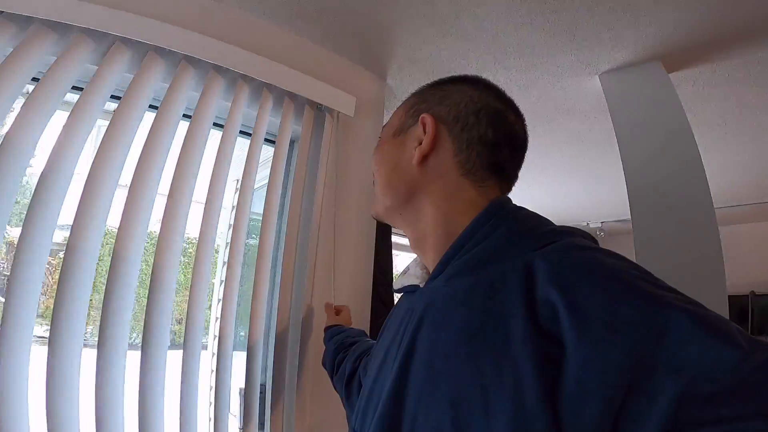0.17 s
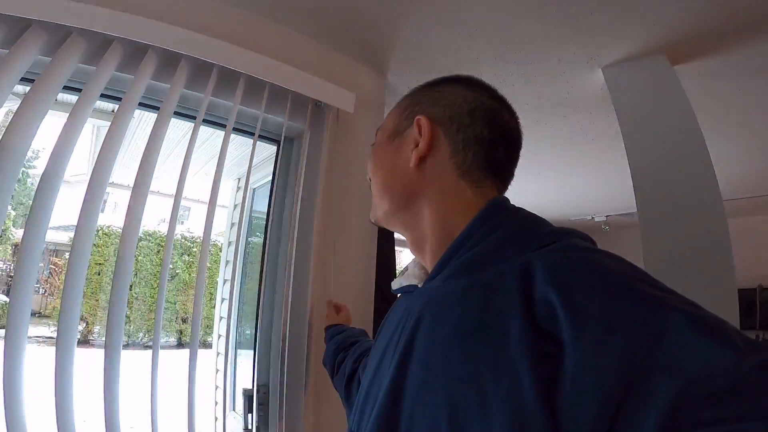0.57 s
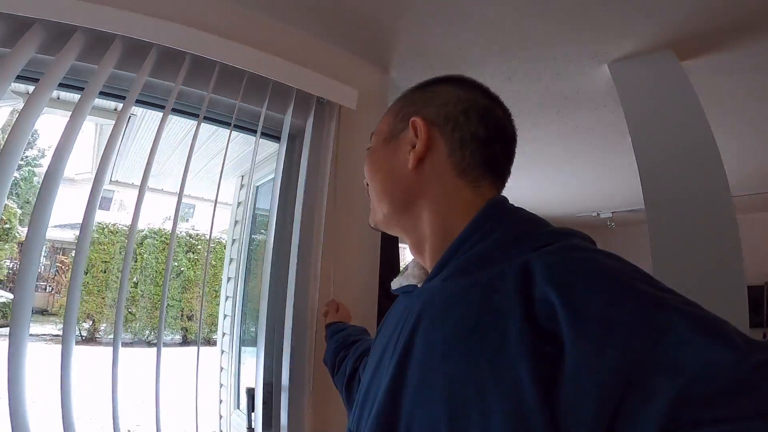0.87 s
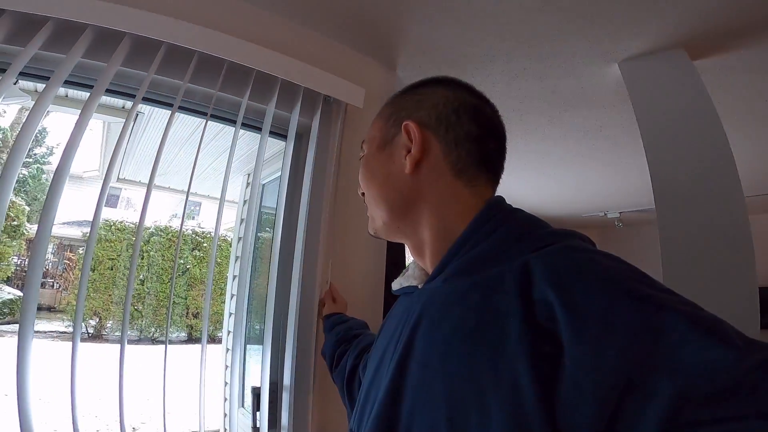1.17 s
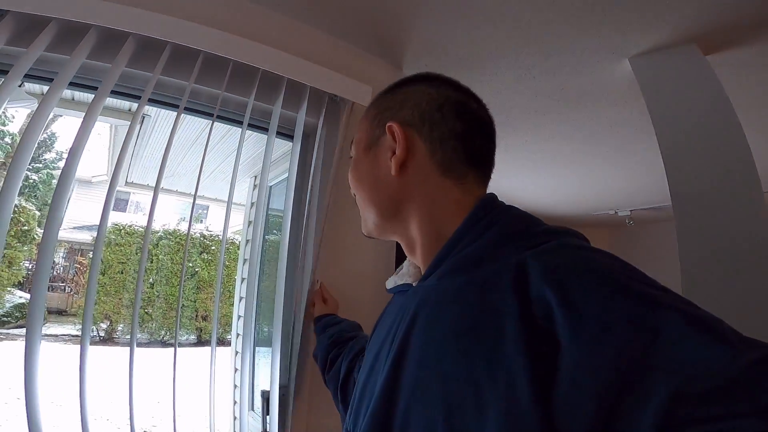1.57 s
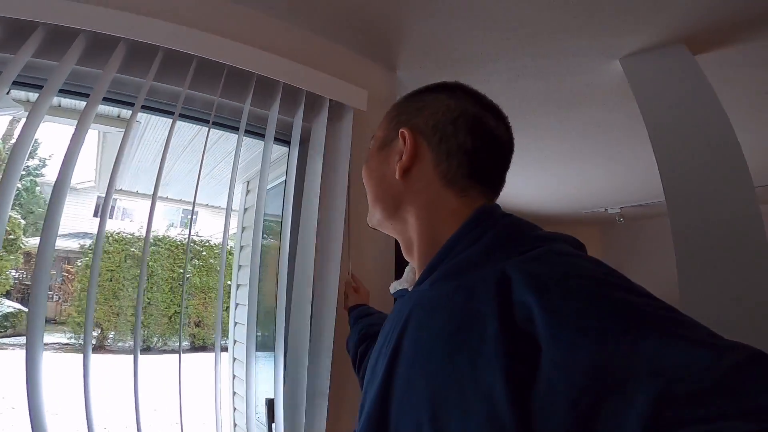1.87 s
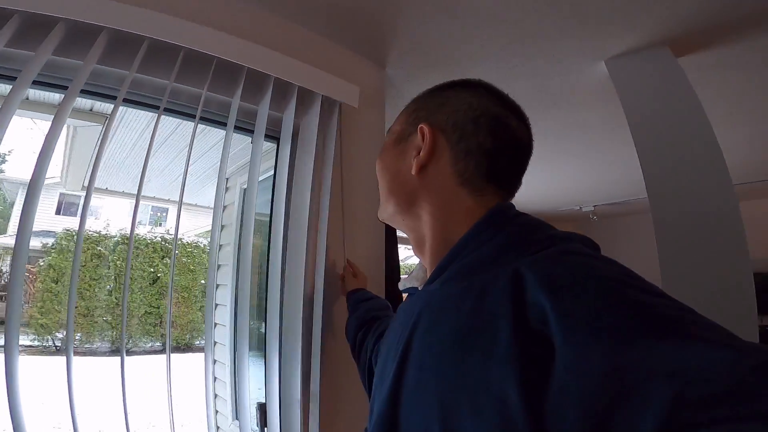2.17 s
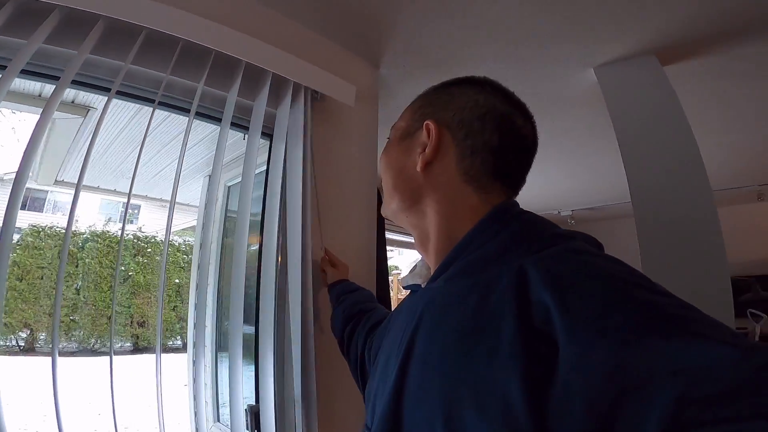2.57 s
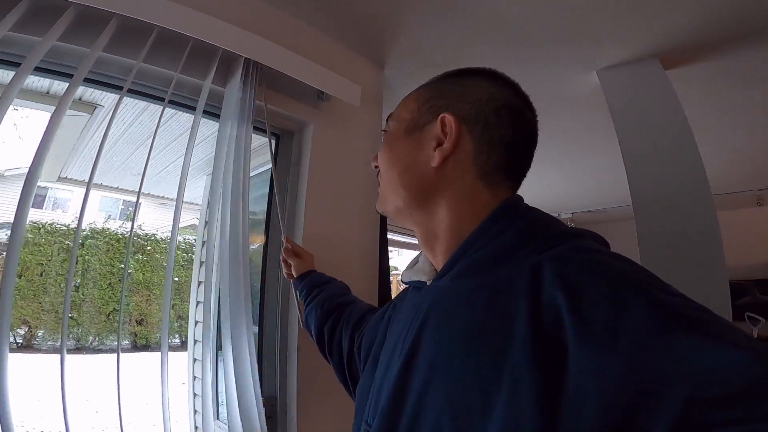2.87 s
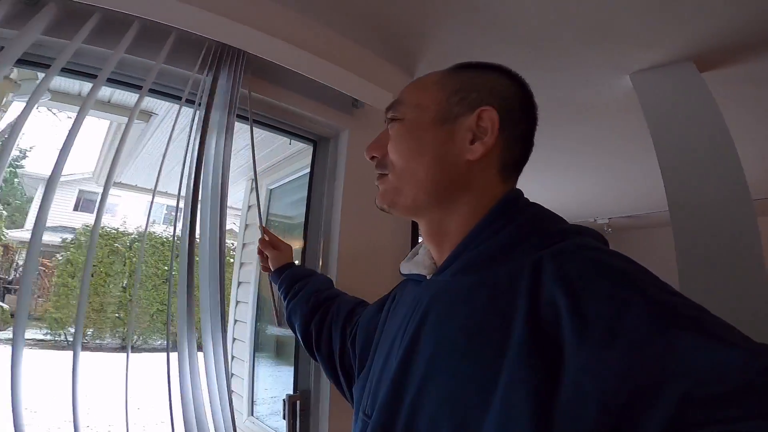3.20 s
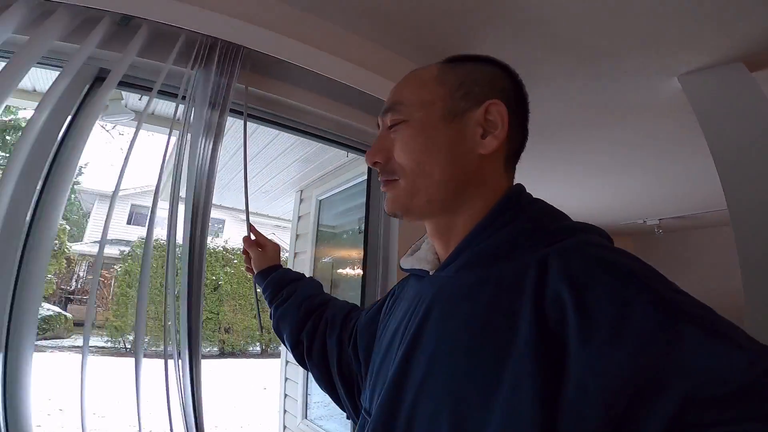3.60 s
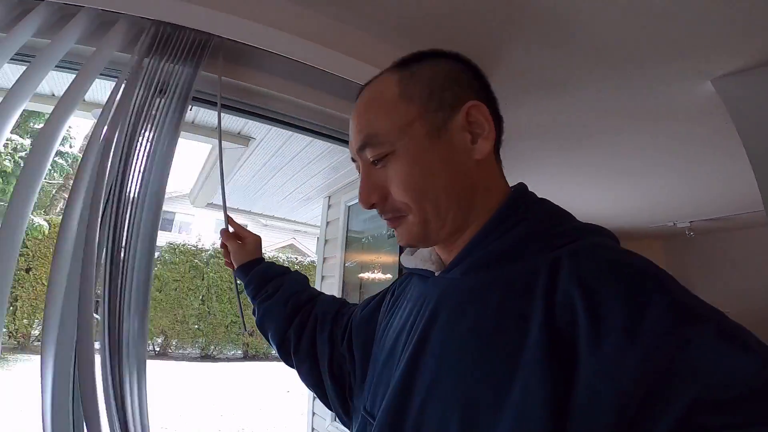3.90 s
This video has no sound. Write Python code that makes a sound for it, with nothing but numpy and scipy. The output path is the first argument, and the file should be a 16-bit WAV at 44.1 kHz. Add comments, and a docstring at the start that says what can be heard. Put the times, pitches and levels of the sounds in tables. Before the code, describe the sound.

Close, hand-held stereo pickup of vertical blinds indoors. Sparse light clicks and faint creaking come first, with a sharper snap after one second. A dense hollow plastic clatter follows around one and a half seconds, with a faint metallic ping, then dies away. From about two and a half seconds the slats are pulled aside with a rough, bright scrape, chattering hooks and repeated slaps until the end.

```python
"""Vertical plastic blinds opened by their wand in a living room, an arm's length from a hand-held microphone.
First the twisted wand makes the tilt rod creak by stick-slip, and carriers snap and ring the head rail.
Then turning slats clap hollowly, as struck plastic, and the freed row clatters and rings on; a metal clip pings.
Last the carriers are dragged along, on the whole faster: they scrape, squeak and hiss as powers of speed,
hooks chatter and the nearing slats slap and tick. Quiet room air and a low rumble lie under it all."""
import sys
import numpy as np
from scipy import signal
from scipy.fft import rfft, irfft, next_fast_len
from scipy.io import wavfile
from scipy.ndimage import uniform_filter1d

SR = 44100
rng = np.random.default_rng(int(sys.argv[2]) if len(sys.argv) > 2 else 0)


def log_audio(samples):
    """Write samples as a 16-bit WAV file to the path given in sys.argv[1]."""
    # one column per channel
    frames = np.atleast_2d(samples).T
    # limit to full scale, then quantise
    limited = np.clip(frames, -1, 1)
    pcm = np.round(limited * 32767).astype(np.int16)
    wavfile.write(sys.argv[1], SR, pcm)


N = 178296
TAIL = 2 ** 15  # samples per hit and room response
TIME = np.arange(N) / SR
TOP_HZ = 15400

# carriers snapping in the rail: start_s, level_db, weight_db, hardness_db, fizz_re_snap_db, build_s,
# chatter_s, rail_freedom_db, clack_hz
SNAPS = [(0.17, -65.5, -14, 2.5, -22, .0005, 0.0052, -12, 2180),
         (0.195, -69, 9, -16, -17, 0.00083, 0.0046, -10, 1190),
         (0.288, -54.5, -15, -10, -19, 0.00046, 0.001, -17, 1420),
         (0.313, -54, -23, -25, -12, 0.0037, 0.0052, -15, 1210),
         (0.613, -57, -11, -20, -17, .001, 0.0019, -19, 1220),
         (0.634, -54.5, -18, -6, -8, 0.0026, 0.011, 0, 2140),
         (0.655, -48.5, -27, -8.5, -8.5, 0.00071, 0.0016, -6, 2090),
         (0.717, -38.5, -14, -14, -27, 0.002, 0.0027, -8, 2150),
         (0.726, -39.5, -13, -9.5, -13.5, 0.0022, 0.0084, -5, 1280),
         (0.982, -45.5, -10.5, -13.5, -31, .0001, .0007, -15, 1340),
         (1.014, -41, -11, -10, -12, 0.0017, 0.01, -6, 1210),
         (1.164, -30, -8, -6, -19, 0.0024, 0.004, -1.5, 1220),
         (1.912, -51.5, -15, -3.5, -17, 0.00075, 0.023, 1, 1680),
         (1.997, -50.5, -16, -6.5, -13.5, 0.00043, 0.004, 5, 2200),
         (2.054, -60.5, -10, 2.5, -15.5, 0.0007, 0.0042, -10, 5600),
         (2.22, -56.5, -30, -4.5, -16, 0.0098, 0.021, -9, 1640),
         (2.324, -45, -13, -4.5, -11, 0.00083, 0.0044, -25, 1900),
         (2.332, -32, -14.5, -9.5, -18, 0.0047, 0.0045, -24, 1940),
         (2.372, -45, -9, -17, -15, 0.00036, 0.0023, -21, 1700),
         (2.594, -30, -38, 1.5, -9.5, 0.0023, 0.0034, -16, 2260),
         (3.11, -38.5, -10, -1.5, -10, 0.00073, 0.0042, -8, 1870),
         (3.214, -32, -18, -7, -20, 0.00091, 0.0058, -16, 1830)]
# slats slapping together: start_s, level_db, weight_db, hardness_db, fizz_re_snap_db, build_s,
# chatter_s, rattle_s, ring_hz
SLAPS = [(1.398, -31.5, -11, -15.5, -21, 0.00078, 0.0045, .018, 1150),
         (1.44, -49.5, 8.5, -11, -15, 0.0019, 0.011, 0.024, 800),
         (1.533, -59, 9, -29, -25, 0.0013, 0.0021, 0.022, 1320),
         (1.539, -34.5, -5, -5.5, -16, 0.00041, 0.0031, 0.06, 447),
         (1.544, -33, -10, -10.5, -24, 0.0013, 0.002, 0.027, 704),
         (1.566, -42, 2.5, -6, -18, 0.00034, 0.0014, 0.031, 450),
         (1.598, -35, -9, -8.5, -19, 0.0014, 0.0022, .04, 1330),
         (1.606, -41.5, -2, -9, -9, .0005, 0.0021, 0.025, 790),
         (1.648, -38, -2, -10, -14, 0.0015, 0.0089, 0.045, 760),
         (1.764, -47, -3, -2, -18, 0.0011, 0.005, .02, 2560),
         (1.778, -49, -28, -22, -7, 0.0012, .0051, .02, 720),
         (2.72, -38, -17.5, -3, -15, .001, 0.027, .041, 2170),
         (2.832, -38, -11, -2.5, -9.5, 0.0016, 0.019, .067, 1440),
         (2.913, -39.5, -10.5, -1.5, -8, 0.00074, 0.013, .05, 1810),
         (2.929, -39, -4, 2.5, -20, .001, .0054, .04, 770),
         (3.078, -43.5, -8, 0, -24, 0.0022, 0.029, .05, 1900),
         (3.365, -34, -5.5, -4.5, -10, 0.003, 0.0037, 0.064, 760),
         (3.485, -37.5, -16, -4, -11, 0.0014, 0.036, .05, 1380),
         (3.627, -37, -16.5, -20, -16, 0.0011, 0.0079, 0.03, 2180),
         (3.743, -36.5, -27, -12, -3, .001, 0.014, .04, 2010),
         (3.849, -33, -20, -7, -12, 0.0014, 0.012, .06, 2100),
         (3.905, -39.5, -5, -2, -12, 0.00083, 0.012, .03, 1390),
         (3.937, -29.5, -8, -0.5, -12, 0.00077, 0.0088, .05, 1470),
         (3.963, -33, -13, -7.5, -5, .001, 0.0096, .04, 1300),
         (4.031, -28.5, -7.5, -2.5, -13, .0002, 0.0033, .05, 1920)]
# pull along the rail: time_s, speed_re_full_db
PULL = [(2.42, -30), (2.55, -10), (2.61, -3.5), (2.8, -5), (3.12, -1), (3.3, -4), (3.44, -5), (3.52, -1.5),
        (3.6, -2), (3.72, 1.5), (4.04, 1.5)]
# twists of the wand: peak_s, relative_force_db
TWISTS = [(0.006, -48), (0.252, -59), (0.315, -57), (0.479, -52), (0.68, -55), (2.019, -49.5), (2.247, -54),
          (2.41, -49)]
# jolts that set hanging slats twanging: start_s, level_db, start_pitch_hz
JOLTS = [(0.297, -54, 286.7), (0.711, -49.5, 271.4), (1.014, -45, 276), (1.164, -42, 272.4),
         (2.016, -54.5, 280.4), (2.336, -46, 278.3)]
# hooks chattering as their carriers are picked up: start_s, level_db, decay_s
HOOKS = [(2.698, -48, 0.0044), (2.822, -44, 0.0091), (3.017, -50, 0.01), (3.073, -41.5, 0.016),
         (3.165, -39.5, 0.0079), (3.175, -48, 0.0048), (3.509, -45, .006), (3.618, -43, 0.0066),
         (3.849, -39.5, 0.0063)]
# heaviest knocks, shaking the wall behind the rail: start_s, level_db
THUDS = [(1.398, -51.5), (1.562, -56), (2.335, -47.5), (2.61, -53)]
# swings of the arm that buffet the microphone: peak_s, relative_level_db
SWINGS = [(0.49, -60), (1.38, -54), (1.62, -59), (1.92, -51), (2.75, -46.5), (3.0, -58), (3.48, -59),
          (3.96, -60)]
# slats coming nearer and damping each other: time_s, direct_db, rattle_db
APPROACH = [(1.5, -4, -12), (2.6, 1, -15), (3.4, 5, -22), (4.04, 5, -22)]

# modes of the head rail and its carriers: freq_hz, relative_db, t60_s
RAIL_MODES = [(1173, 13, .3), (1217, 9, .3), (1351, 12, .3), (1390, 12, .3), (1646, 3, .25), (1774, 4, .25),
              (1983, 4, .25), (2178, 2, .25), (3246, -3, .3), (3418, -3, .3), (4597, -4, .27),
              (4963, 2, .25), (5146, 3, .22), (6401, 0, .24)]
# modes of a small metal clip: freq_hz, level_db, t60_s
CLIP_MODES = [(3321, -65, .25), (4350, -60, .38), (4635, -65, .17), (5109, -53, .33), (5240, -63, .22),
              (5900, -56, .26), (6761, -57, .26), (7020, -69, .2), (8037, -72, .2), (8640, -69, .2)]
# hollow modes of the swinging row of slats: freq_hz, level_db, t60_s
ROW_MODES = [(389, -34, 0.57), (450, -39, .35), (745, -44, 0.64), (1037, -45, .4)]

# colour of the struck rail: freq_hz, relative_db
RAIL = [(60, -57), (130, -21), (190, -14.5), (280, -9.5), (520, -14.5), (590, -20.5), (800, -13),
        (1000, -5), (1160, 7.5), (1270, 2), (1390, 12), (1600, 1.5), (2150, 4), (2700, -6), (3100, -4),
        (3450, -2.5), (3900, -7.5), (5100, -5.5), (5650, -11.5), (6350, -7.5), (6850, -16.5), (8100, -25),
        (10000, -39.5), (13000, -57), (16000, -60)]
# colour of clapping slats: freq_hz, relative_db
SLAT = [(60, -39), (150, -7), (260, -5.5), (350, 4), (440, 1.5), (530, -7.5), (610, 3.5), (720, 4),
        (900, -0.5), (1100, 4.5), (1320, 4), (1520, -0.5), (2000, 1.5), (2350, -4.5), (2750, 0),
        (3300, -8.5), (3800, -6.5), (6500, -15), (10000, -27), (15000, -45)]
# colour of sliding carriers: freq_hz, relative_db
SLIDE = [(59, -33), (100, -29), (214, -21), (281, -13.5), (378, -23.5), (447, -22.5), (697, -19.5),
         (956, -11.5), (1130, -3.5), (1440, 2), (1650, -2), (1900, 1.5), (2220, 1.5), (3120, -9),
         (5300, -5.5), (6850, -4.5), (8000, -13.5), (10000, -15.5), (12300, -23), (15500, -40)]
# colour of the rubbing tilt rod: freq_hz, relative_db
RUB = [(60, -39), (150, -7), (260, 6.5), (400, -2.5), (600, -7), (850, -4), (1200, 3.5), (1450, 7),
       (1750, -5), (2200, 1), (2700, -11.5), (3400, -12.5), (5000, -19), (7000, -24), (10000, -40),
       (15000, -41)]
# colour of the room air: freq_hz, relative_db
FLOOR = [(20, -28), (50, -60), (100, -6), (250, 5.5), (500, -11), (1300, -3), (2500, -17), (6000, -18),
         (15000, -36)]

# reverberation of the room: freq_hz, t60_s
ROOM = [(150, 0.88), (400, 0.41), (1000, 0.52), (2800, 0.47), (7000, 0.33), (14000, 0.064)]
# the two microphone ports: freq_hz, likeness_0_to_1, left_minus_right_db
PORTS = [(60, .97, 0), (250, .98, -2.8), (600, .95, -2.8), (1200, .87, 2.4), (2000, .7, 4.2),
         (4000, .42, 3.2), (8000, .03, 3.2), (13000, .05, .8)]
# phase between the ports: freq_hz, left_lead_rad
PORT_PHASE = [(50, -1.3), (260, -1.4), (600, -0.96), (1400, 0.6), (3000, -1.27), (8000, -0.3)]

TWIST_RISE_S, TWIST_FALL_S = 0.039, 0.021
JOSTLE_S, JOSTLE_HOLD_S, JOSTLE_T60_S = 1.538, 0.056, 0.54  # freed slats jostle their neighbours
CLIP_S = 1.6
GATHER_S = 2.6  # the first slat is caught and dragged along
SWING_S = 0.035


def snaps(hidden_db=-2, loose_db=6, clack_db=0, clack_width=0.26):
    """Carriers let go behind the valance, each with its own clack, and ring the rail."""
    out = np.zeros((2, N))
    for s, db, weight_db, hard_db, fizz_db, build_s, chatter_s, free_db, clack_hz in SNAPS:
        direct_db, rattle_db = approach(s)
        push = blow(build_s, chatter_s, chatter_db=10.0, rattle_db=rattle_db + loose_db, rattle_s=0.006)
        heard = even(through(push, room(direct_db + hidden_db, early_db=-2.5)))
        struck = rail(heard, ring_db=free_db - 55)
        clack = boost(struck, clack_hz, clack_width, clack_db)
        add(out, s, clack, db, weight_db, hard_db, fizz_db)
    return out


def rail(x, ring_db):
    """The head rail's broad body, and its modes ringing on in proportion to the blow."""
    t = np.arange(TAIL) / SR
    ring = 0
    for hz, db, t60_s in RAIL_MODES:
        ring = ring + undb(db - 60 * t / t60_s) * np.sin(2 * np.pi * (hz * t + rng.random()))
    ring = ring * (1 - np.exp(-t / .002))
    strength = np.linalg.norm(x, axis=1, keepdims=True)
    return colour(x, RAIL) + undb(ring_db) * ring * strength


def slaps(ring_db=-2, ring_width=0.061):
    """Broad plastic faces clap, hollow and short; the ring depends on where they meet."""
    out = np.zeros((2, N))
    for s, db, weight_db, hard_db, fizz_db, build_s, chatter_s, rattle_s, ring_hz in SLAPS:
        direct_db, rattle_db = approach(s)
        push = blow(build_s, chatter_s, chatter_db=14.5, rattle_db=rattle_db, rattle_s=rattle_s)
        sound = colour(even(through(push, room(direct_db, early_db=-0.5))), SLAT)
        clap = boost(sound, ring_hz, ring_width, ring_db)
        add(out, s, clap, db, weight_db, hard_db, fizz_db)
    return out


def approach(s):
    """Direct sound and loose rattle of the slats at this moment, in dB."""
    times_s, direct_db, rattle_db = np.transpose(APPROACH)
    return np.interp(s, times_s, direct_db), np.interp(s, times_s, rattle_db)


def drag(scrape_db=-31.0, squeak_db=-37, hiss_db=-38, rustle_db=-46, sing_db=-37.0, sing_hz=2010,
         hiss_power=0.82, rustle_power=0.1, sing_power=3.8):
    """Carriers scrape, squeak and hiss, slats rustle, the rail sings; each grows as a power of speed."""
    speed = pull_speed() * surge(PULL[0][0], rise_s=0.014, fall_s=np.inf)
    gathering = surge(GATHER_S, rise_s=0.0061, fall_s=np.inf)
    space = room(direct_db=-2.0, early_db=10)
    rustle, scrape, hiss, fizz = registers(carriers())
    squeak = through(squeaks(), space)
    scrape = undb(scrape_db) * unit(scrape) + undb(squeak_db) * unit(squeak)
    song = band(through(contacts(2000, 2), space), sing_hz - 70, sing_hz + 70, order=2)
    song = waver(song, 28, 4, 18) * judder(1.2, 15, 70)
    return (scrape * speed
            + undb(hiss_db) * unit(hiss + fizz) * speed ** hiss_power
            + undb(rustle_db) * unit(rustle) * gathering * speed ** rustle_power
            + undb(sing_db) * unit(song) * speed ** sing_power)


def pull_speed():
    """Carrier speed as a gain, 1 at full speed."""
    return undb(np.interp(TIME, *np.transpose(PULL)))


def carriers(count=3, per_s=450, scatter_db=0.0):
    """Several carriers catch and run on at random; a common judder from the wand acts on all."""
    out, shared = 0, judder(2.5, 25, 130)
    for _ in range(count):
        grip = shared * judder(1.5, 6, 30)
        out = out + through(contacts(per_s, scatter_db) * grip, room(direct_db=0, early_db=4))
    return colour(out, SLIDE)


def squeaks(per_s=45, low_hz=1380, high_hz=2350, length_s=0.0062, scatter_db=9):
    """A sticking carrier squeaks for a few dozen cycles, each time at its own gliding pitch."""
    out, t = np.zeros(N + TAIL), np.arange(2 ** 12) / SR
    for k, (when, pitch, size, glide) in enumerate(rng.random((int(per_s * N / SR), 4))):
        start = min(int((k + 2 * when) / per_s * SR), N)
        hz = low_hz + (high_hz - low_hz) * pitch
        phase = 2 * np.pi * hz * t * (1 + (glide - .5) * t)
        swell = t / length_s * np.exp(-t / length_s)
        out[start:start + len(t)] += undb(scatter_db * size) * np.sin(phase) * swell
    return out[:N]


def creak(catch_db=3.5):
    """The tilt rod sticks and slips in the carriers, rustling unevenly as each twist builds and eases."""
    force = sum(undb(db) * surge(s, TWIST_RISE_S, TWIST_FALL_S) for s, db in TWISTS)
    slips = contacts(1200, 1.47) * judder(catch_db, 18.6, 41)
    rub = unit(colour(slips, RUB)) * force
    return through(rub, room(direct_db=-13.5, early_db=0))


def jostle(hollow_db=-34, edge_db=-37, edge_t60_s=0.78):
    """Freed slats jostle in an uneven clatter; its bright edge outlasts its hollow body."""
    clatter = through(colour(contacts(490, 5.9), SLAT), room(direct_db=-6, early_db=0))
    hollow = unit(band(clatter, 290, 1460, order=2))
    edge = unit(band(clatter, 1300, 17000, order=2))
    hollow_fade = surge(JOSTLE_S, 0.00075, JOSTLE_T60_S / np.log(1000), JOSTLE_HOLD_S)
    edge_fade = surge(JOSTLE_S, 0.00075, edge_t60_s / np.log(1000), JOSTLE_HOLD_S)
    return undb(hollow_db) * hollow * hollow_fade + undb(edge_db) * edge * edge_fade


def hooks(low_hz=5200, high_hz=10500):
    """Each hook gives a short, bright burst of ticks when its carrier is jerked along."""
    out, t = np.zeros((2, N + TAIL)), np.arange(TAIL) / SR
    for s, db, decay_s in HOOKS:
        chatter = contacts(1700, 2, count=TAIL) * np.exp(-t / decay_s)
        burst = through(chatter, room(direct_db=-4.5, early_db=9))
        burst = band(burst, low_hz, high_hz, order=2)
        start = int(s * SR)
        out[:, start:start + TAIL] += undb(db) * burst / np.std(burst[:, :SR // 50])  # level over 20 ms
    return out[:, :N]


def ticks(tick_db=-44, low_hz=1300):
    """Hooks and slat edges tick at random, with short early echoes, in proportion to the pull's speed."""
    speed = pull_speed() * surge(GATHER_S, rise_s=0.028, fall_s=np.inf)
    clicks = through(contacts(90, 2.0), room(direct_db=-6, early_db=10, early_s=.005))
    return undb(tick_db) * unit(band(clicks, low_hz, 7000, order=4)) * speed


def twangs(end_hz=175, sink_s=0.207, t60_s=0.42, blur_hz=34, blur=0.64, rise_s=0.0071):
    """Jolted slats differ a little and slower bending waves return later: a blurred, sinking pitch."""
    out, t = np.zeros(N + TAIL), np.arange(TAIL) / SR
    for s, db, start_hz in JOLTS:
        hz = end_hz + (start_hz - end_hz) * np.exp(-t / sink_s)
        scatter = unit(band(rng.standard_normal((2, TAIL)), 11.3, blur_hz, order=2))
        phase = 2 * np.pi * np.cumsum(hz) / SR
        blurred = scatter[0] * np.sin(phase) + scatter[1] * np.cos(phase)
        wobble = unit(np.sin(phase) + blur * blurred / np.sqrt(2))
        start = int(s * SR)
        out[start:start + TAIL] += wobble * (1 - np.exp(-t / rise_s)) * undb(db - 60 * t / t60_s)
    return out[:N] * port_gains(270)


def rings():
    """The metal clip pings, and the freed row of slats rings hollow."""
    clip = ringing(CLIP_S, CLIP_MODES, split_hz=130, twin_db=-4, rise_s=.001)
    row = ringing(JOSTLE_S, ROW_MODES, split_hz=30, twin_db=-7, rise_s=0.025)
    return clip + row


def ringing(s, modes, split_hz, twin_db, rise_s):
    """Modes that ring on from one moment; each has a weaker twin close by, so it beats."""
    t, out = np.maximum(TIME - s, 0), np.zeros((2, N))
    for (hz, db, t60_s), chance in zip(modes, rng.random((len(modes), 4))):
        twin_hz = hz + split_hz * (2 * chance[0] - 1)
        twin = undb(twin_db) * np.sin(2 * np.pi * (twin_hz * t + chance[1:3, None]))
        main = np.sin(2 * np.pi * (hz * t + chance[3]))
        out += port_gains(hz) * (main + twin) * undb(db - 60 * t / t60_s)
    return out * (1 - np.exp(-t / rise_s))


def thuds(low_hz=90, high_hz=145, rise_s=0.0082, fall_s=0.042):
    """A dull boom of the wall that comes a little late and soon dies."""
    boom = unit(band(diffuse(N), low_hz, high_hz, order=2))
    return boom * sum(undb(db) * surge(s + rise_s, rise_s, fall_s) for s, db in THUDS)


def background(floor_db=-71, sway_db=-1, tremble_db=-74):
    """Quiet room air, and a rumble of the hand-held ports, mostly left, that swells with each swing."""
    rumble = unit(band(rng.standard_normal((2, N)), 19.7, 41.5, order=3)) * undb([[4], [-7]])
    sway = undb(tremble_db) + sum(undb(db + sway_db) * surge(s, SWING_S, SWING_S) for s, db in SWINGS)
    air = undb(floor_db) * unit(colour(diffuse(N), FLOOR))
    return air + rumble * sway


def blow(build_s, chatter_s, chatter_db, rattle_db, rattle_s, rattle_top_hz=4000, crisp_s=0.0007):
    """A first contact, weak if the parts meet gradually, quick chatter, and a softer settling rattle."""
    t = np.arange(1, TAIL + 1) / SR
    build_s = max(build_s, .0001)
    chatter_fade = (1 - np.exp(-t / build_s)) * np.exp(-t / max(chatter_s, .0005))
    chatter = unit(contacts(5000, 0.17, count=TAIL) * chatter_fade)
    settling = contacts(1200, 5.8, count=TAIL) * np.exp(-t / rattle_s)
    rattle = unit(band(settling, 220, rattle_top_hz, order=1))
    push = (undb(chatter_db) * chatter + undb(rattle_db) * rattle) / np.sqrt(TAIL)
    push[0] += np.exp(-build_s / crisp_s)
    return push


def contacts(per_s, scatter_db, count=N):
    """Random tiny contacts; scatter makes a few harder than the rest."""
    size = undb(scatter_db * np.minimum(rng.exponential(size=count), 4)) * rng.choice([-1, 1], count)
    return unit(size * (rng.random(count) < per_s / SR))


def judder(depth_db, slow_hz, fast_hz):
    """Gain of a sliding part that catches and runs on at random."""
    drift = unit(band(rng.standard_normal(N), slow_hz, fast_hz, order=2))
    return undb(depth_db * np.clip(drift, -2, 2))


def waver(x, spread_hz, slow_hz, fast_hz):
    """Let a resonance wander up and down in pitch."""
    drift = unit(band(rng.standard_normal(N), slow_hz, fast_hz, order=2))
    shift_hz = spread_hz * np.clip(drift, -2, 2)
    analytic = signal.hilbert(x, next_fast_len(N))[:, :N]
    return np.real(analytic * np.exp(2j * np.pi * np.cumsum(shift_hz) / SR))


def surge(s, rise_s, fall_s, hold_s=0):
    """Envelope that grows until a moment, holds, and dies away exponentially."""
    return np.exp(np.minimum(TIME - s, 0) / rise_s - np.maximum(TIME - s - hold_s, 0) / fall_s)


def add(out, s, sound, db, weight_db, hard_db, fizz_db):
    """Place a hit: weight sets its body, hardness its snap and fizz, with gentle slopes between."""
    attack = int(.02 * SR)
    fade = 1 - np.linspace(0, 1, attack) ** 12
    edges = (np.array([50, 800, 3000, 8500]) * attack / SR).astype(int)
    levels_db = db + np.array([weight_db, 0, hard_db, hard_db + fizz_db])
    for _ in range(2):  # the slopes overlap, so approach the levels in two passes
        power = 2 * np.mean(np.abs(rfft(sound[:, :attack] * fade) / attack) ** 2, axis=0)
        body, ring, snap, fizz = levels_db - 10 * np.log10(np.add.reduceat(power, edges))
        outline = [(600, body), (1100, ring), (1600, ring), (4600, snap), (6500, snap), (10000, fizz)]
        sound = colour(sound, outline)
    start = int(s * SR)
    out[:, start:start + TAIL] += sound[:, :N - start]


def even(x, fine_hz=110, broad_hz=1100):
    """Level the chance peaks and dips of a contact burst, so that the struck part gives the colour."""
    hz = np.fft.rfftfreq(TAIL, 1 / SR)
    power = np.abs(rfft(x.mean(axis=0))) ** 2
    fine, broad = (uniform_filter1d(power, int(width / hz[1])) for width in (fine_hz, broad_hz))
    return colour(x, np.column_stack([hz, 10 * np.log10(broad / fine)])[1:])


def boost(x, hz, width, db):
    """Bring out one broad resonance."""
    return x + undb(db) * band(x, hz / (1 + width), hz * (1 + width), order=1)


def room(direct_db, early_db, early_s=0.015):
    """Direct sound, quick echoes off glass and ceiling, and a tail that loses its treble first."""
    hz, t, cells = signal.stft(diffuse(TAIL), SR, nperseg=2 ** 8)
    fade = undb(-60 * t / along(ROOM, hz)[:, None]) + undb(early_db) * np.exp(-t / early_s)
    tail = signal.istft(cells * fade, SR)[1][:, :TAIL]
    direct = []
    lags = rng.choice(np.arange(2), size=2)  # samples
    for side, lag in zip((1, -1), lags):
        impulse = 1. * (np.arange(TAIL) == lag)
        direct.append(colour(impulse, [(hz, side * db / 2) for hz, _, db in PORTS]))
    return undb(direct_db) * np.vstack(direct) + unit(tail) / np.sqrt(TAIL)


def diffuse(count):
    """Noise from all sides at the two ports: alike in the bass, unrelated in the treble."""
    hz = np.fft.rfftfreq(count, 1 / SR)
    alike, sides = np.clip(along(PORTS, hz), 0, 1), np.array([[1], [-1]])
    mid, side = rfft(rng.standard_normal((2, count)))
    pair = mid * np.sqrt(1 + alike) + sides * side * np.sqrt(1 - alike)
    ports = port_gains(hz) * np.exp(.5j * sides * along(PORT_PHASE, hz))
    return unit(irfft(pair * ports, count))


def port_gains(hz):
    """Left and right gains of the ports."""
    return undb(np.array([[1], [-1]]) * along(PORTS, hz, order=2) / 2)


def colour(x, points):
    """Causal filter with the given (Hz, dB) outline, from the cepstrum of its log gain."""
    cepstrum = irfft(np.log(undb(along(points, np.fft.rfftfreq(2048, 1 / SR)))))
    cepstrum[1:1024] *= 2  # fold to minimum phase
    cepstrum[1025:] = 0
    return through(x, irfft(np.exp(rfft(cepstrum))))


def through(x, response):
    """Convolve, keeping the length."""
    return signal.fftconvolve(np.atleast_2d(x), np.atleast_2d(response), axes=-1)[:, :x.shape[-1]]


def registers(x):
    """Split a sound into body, ring, snap and fizz."""
    return band(x, 50, 800), band(x, 800, 3000), band(x, 3000, 8500), band(x, 8500, 18000)


def band(x, lo_hz, hi_hz, order=3):
    """Band-pass filter."""
    edges_hz = [lo_hz, min(hi_hz, SR / 2 - 100)]
    return signal.sosfilt(signal.butter(order, edges_hz, "band", fs=SR, output="sos"), x)


def along(table, hz, order=1):
    """Read one column of a table on a log-frequency axis."""
    table = np.array(table, float)
    return np.interp(np.log(hz + 1), np.log(table[:, 0]), table[:, order])


def unit(x):
    """Scale to rms 1."""
    return x / np.sqrt(np.mean(x ** 2) + 1e-20)


def undb(db):
    """Decibels to gain."""
    return 10 ** (np.asarray(db) / 20)


def scene():
    """The slats are turned open, then drawn aside."""
    strikes = snaps() + twangs() + slaps() + rings() + thuds() + jostle()
    sliding = creak() + drag() + hooks() + ticks()
    return strikes + sliding + background()


def record(dry):
    """The microphone cuts the top of the treble."""
    return signal.sosfilt(signal.ellip(8, .2, 70, TOP_HZ, fs=SR, output="sos"), dry)


dry = scene()
out = record(dry)
log_audio(out)
```